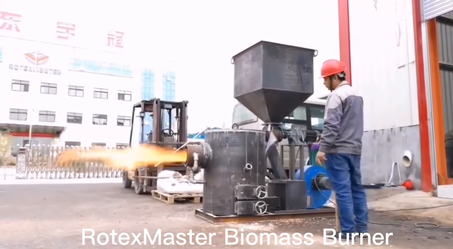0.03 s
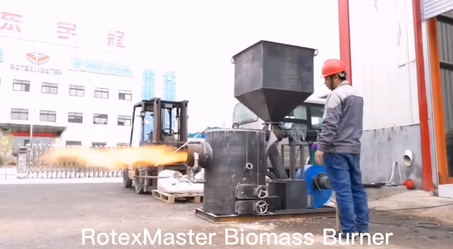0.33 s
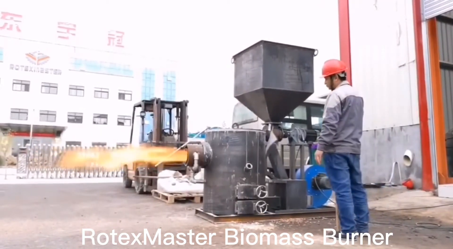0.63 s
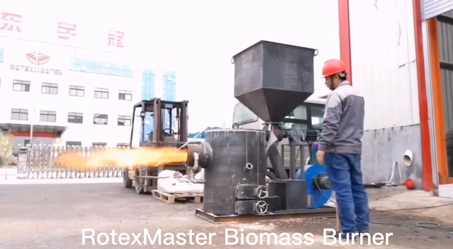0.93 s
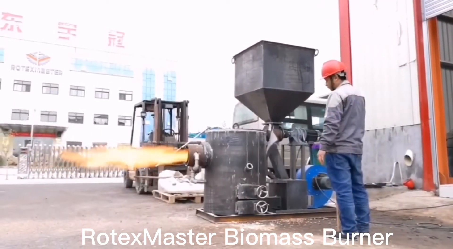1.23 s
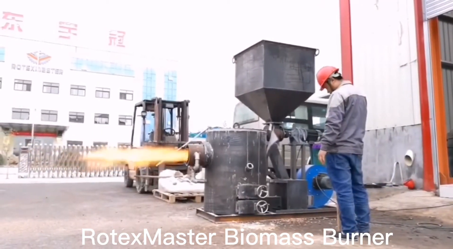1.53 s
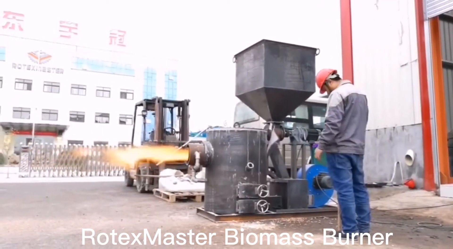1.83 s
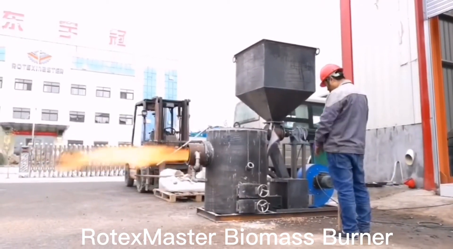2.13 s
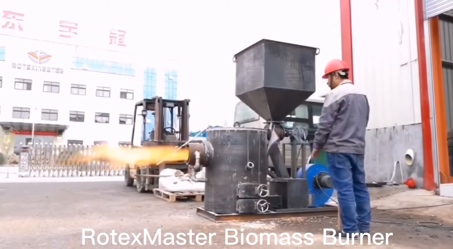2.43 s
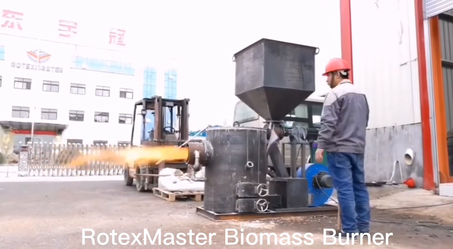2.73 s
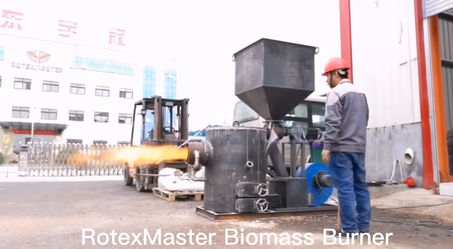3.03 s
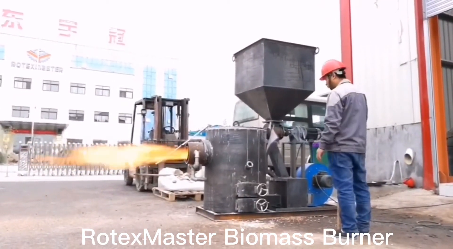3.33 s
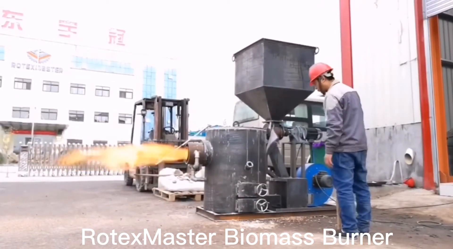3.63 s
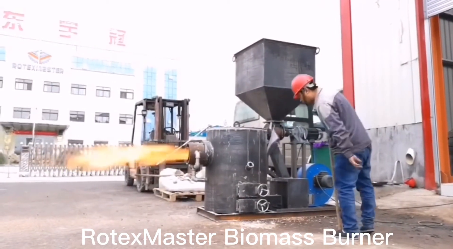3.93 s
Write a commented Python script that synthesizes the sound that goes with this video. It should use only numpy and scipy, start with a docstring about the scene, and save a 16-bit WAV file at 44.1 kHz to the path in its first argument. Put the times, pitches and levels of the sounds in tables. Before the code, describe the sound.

A jet of flame from a burner makes a continuous low, flickering roar, heard from a few metres outdoors. Rasping gas, hissing air and a faint fan hum go with it throughout, with one brief spit partway through.

```python
"""An open yard, where a pellet burner shoots a steady jet of flame a few metres away.
Combustion noise makes a low roar that surges and now and then throbs. Turbulent gas rasps and
excites the hollow resonances of the burner tube, and the nozzle spits once. The forced air
hisses, fluttering with the flame, over the faint tones of the blower and its motor."""
import sys
import numpy as np
from scipy import signal
from scipy.fft import rfft, irfft, next_fast_len
from scipy.io import wavfile
from scipy.ndimage import uniform_filter1d, map_coordinates

SR = 44100
rng = np.random.default_rng(int(sys.argv[2]) if len(sys.argv) > 2 else 0)


def to_wav(sig):
    """Store sig (one row per channel, or 1-D mono) as 16-bit WAV at the path in sys.argv[1].

    Samples outside -1..1 are clipped; the rate is SR.
    """
    pcm = np.clip(np.atleast_2d(sig), -1, 1) * 32767
    pcm = np.round(pcm).astype(np.int16)
    wavfile.write(sys.argv[1], SR, pcm.T)  # frames by channels


N = 176400

# flicker of the flame's treble (time [s], relative level [dB])
TREBLE_FLICKER = [(0.0, -34.5), (0.18, -27), (0.28, -30), (0.5, -29), (0.54, -27), (0.64, -33.5),
                  (0.72, -27), (0.84, -30), (0.9, -39), (0.98, -28.5), (1.22, -30.5), (1.26, -24.5),
                  (1.3, -36), (1.36, -26.5), (1.42, -38), (1.46, -27), (1.52, -31), (1.64, -28.5),
                  (1.68, -33), (1.9, -27.5), (2.06, -32.5), (2.12, -27), (2.22, -32.5), (2.36, -26),
                  (2.4, -42), (2.48, -26.5), (2.54, -36), (2.58, -29.3), (2.72, -37), (2.82, -25),
                  (2.88, -33.5), (3.0, -28.5), (3.16, -33.5), (3.99, -28.5)]


def amp(db):
    """Amplitude ratio of a level in decibels."""
    return 10 ** (np.asarray(db) / 20)


def unit(x):
    """Normalisation to rms 1."""
    return x / np.sqrt(np.mean(x ** 2) + 1e-20)


def colour(points):
    """Spectral envelope through (frequency [Hz], gain [dB]) points on a log frequency axis."""
    f, db = np.transpose(points)
    return lambda hz: amp(np.interp(np.log(hz + 1), np.log(f + 1), db))


def curve(rows):
    """Linear interpolation of (time [s], level [dB]) rows to one level per sample."""
    return np.interp(np.arange(N) / SR, *np.transpose(rows))


def swell_db(rows):
    """Fluctuation of a level curve about its mean."""
    level_db = curve(rows)
    return level_db - level_db.mean()


def wobble(rate_hz):
    """Band-limited random modulation: a spline through rate_hz random values a second."""
    knots = rng.standard_normal(int(N * rate_hz / SR) + 4)
    return map_coordinates(knots, [np.arange(N) * rate_hz / SR])


def puff(at_s, half_s):
    """Gaussian envelope that falls to 1/e at half_s either side of its peak."""
    return np.exp(-((np.arange(N) / SR - at_s) / half_s) ** 2)


def filtered(x, response):
    """Linear filtering: the spectrum of x is multiplied by a frequency response."""
    size = next_fast_len(N + 8192)
    return irfft(rfft(x, size) * response(np.fft.rfftfreq(size, 1 / SR)), size)[:N]


def steady(x, span_s):
    """Division by the running rms holds x near rms 1, removing swells longer than span_s."""
    window = np.hanning(int(span_s * SR) * 2 + 1)
    power = signal.fftconvolve(x ** 2, window, 'same') / signal.fftconvolve(np.ones(N), window, 'same')
    return x / np.sqrt(np.abs(power) + 1e-20)


def turbulence(response, patchy_db, width_bins):
    """Intermittency: eddies give coloured noise brief patches of random gain, at an even overall rms."""
    spectra = signal.stft(rng.standard_normal(N), nperseg=512)[2]
    eddies = uniform_filter1d(rng.standard_normal(spectra.shape), size=width_bins, axis=0)
    eddies = uniform_filter1d(eddies, size=8, axis=1)
    eddies = eddies - uniform_filter1d(eddies, size=36, axis=1)  # only short-lived patches remain
    patchy = signal.istft(spectra * amp(patchy_db * np.tanh(unit(eddies))), nperseg=512)[1][:N]
    return steady(filtered(patchy, response), span_s=0.057)


def blower(drift_hz=5, waver_db=5.0):
    """Rotating machinery radiates tones: fan and motor, each wavering in pitch and level."""
    # tones of the fan and thin whine of its motor (frequency [Hz], median rms level [dB])
    fan_tones = [(321, -43.5), (492, -49.5), (657, -62)]
    motor_whine = [(7053, -64), (7849, -60)]
    tones = np.zeros(N)
    for hz, db in list(fan_tones) + list(motor_whine):
        phase = 2 * np.pi * np.cumsum(hz + drift_hz * wobble(21.83)) / SR
        tones += np.sqrt(2) * amp(db + waver_db * wobble(7.58)) * np.sin(phase)
    return tones


def nozzle_spit(peak_db=-34):
    """A transient jet: one short puff of gas from the nozzle gives a burst of bright noise."""
    # spectrum of the spit (frequency [Hz], relative spectral level [dB])
    spectrum = [(2500, -30), (4800, 2), (6500, 0), (9500, 1), (11000, -30)]
    gas = unit(filtered(rng.standard_normal(N), colour(spectrum)))
    return gas * amp(peak_db) * puff(at_s=1.373, half_s=0.013)


def air_hiss(level_db=-36.5, swell_depth=0.6):
    """Jet noise: turbulence in the forced air makes a high hiss with swells of its own."""
    # spectrum of the air jet (frequency [Hz], relative spectral level [dB])
    spectrum = [(1000, -112), (3500, -2.5), (4600, -6), (5070, -6.5), (5550, -1), (5900, -5), (6350, 2),
                (6750, -6), (7050, -2.5), (7300, -1.5), (7800, 2), (8450, 2.5), (8750, -4.5), (8950, -0.5),
                (9450, -2.5), (9850, -8.5), (11300, -8.5), (12000, -26.5)]
    # swells of the air jet (time [s], relative level [dB])
    air_swells = [(0.0, -39), (0.2, -37.5), (0.39, -35), (0.42, -38), (0.58, -38.5), (0.77, -36),
                  (0.88, -39), (1.27, -34), (1.34, -41), (1.41, -40), (1.44, -36.5), (1.89, -35),
                  (2.08, -39), (2.15, -38), (2.39, -38), (2.43, -40), (2.68, -37), (2.71, -41),
                  (2.82, -32.5), (2.87, -40.5), (3.01, -36.5), (3.13, -42), (3.27, -37), (3.38, -40.5),
                  (3.49, -36.5), (3.69, -39), (3.73, -34.5), (4.0, -37.5)]
    hiss = turbulence(colour(spectrum), patchy_db=4.5, width_bins=5)
    return hiss * amp(level_db + swell_depth * swell_db(air_swells))


def gas_rush(level_db=-33.5, flicker_depth=0.8, rasp_db=1.6, rasp_hz=220):
    """Broadband flow noise of the rushing gas; fast amplitude modulation makes it rasp."""
    # turbulence between the tube's resonances (frequency [Hz], relative spectral level [dB])
    spectrum = [(150, -30), (500, 5.5), (830, 4), (1400, 5.5), (1580, -1.5), (2050, 4.5), (2950, -5),
                (3250, -58), (4100, -4), (4800, -4.5), (5200, -50), (9000, -60)]
    rush = turbulence(colour(spectrum), patchy_db=6.5, width_bins=6)
    return rush * amp(level_db + flicker_depth * swell_db(TREBLE_FLICKER) + rasp_db * wobble(rasp_hz))


def burner_tube(level_db=-27, flicker_depth=0.3):
    """Air-column resonance: the tube's modes pick hollow bands out of the turbulence."""
    # modes of the tube (frequency [Hz], half-width at half amplitude [Hz], relative level [dB])
    modes = [(610, 32, -1), (649.7, 26, 2.5), (1115, 160, 1.5), (1165, 140, -2), (1335, 92, 0),
             (1780, 113, -7.5), (2580, 340, -8), (2750, 283, -6.5), (3525, 69, -6.5), (3800, 190, -8)]

    def response(hz):
        """The resonance peaks add in power."""
        peaks = (amp(db) / (1 + ((hz - centre) / width) ** 2) for centre, width, db in modes)
        return np.sqrt(sum(peak ** 2 for peak in peaks))

    hollow = turbulence(response, patchy_db=4.5, width_bins=3)
    return hollow * amp(level_db + flicker_depth * swell_db(TREBLE_FLICKER))


def flame_roar(throb_db=-2, displaced_share=0.4):
    """Combustion noise swells and sags; in a throb it falls into step for a few strong cycles."""
    # spectrum of the combustion noise (frequency [Hz], relative spectral level [dB])
    spectrum = [(15, -19), (30, -18), (70, -6), (100, -3), (130, 0), (160, -1.6), (185, 1.5), (235, -1.5),
                (262, -6), (292, -5), (340, -6.5), (385, -9), (450, -18.5), (540, -30), (900, -53),
                (2000, -89)]
    # surges of the roar (time [s], level [dB])
    surges = [(0.0, -14), (0.02, -9.5), (0.06, -21.5), (0.08, -11.5), (0.26, -16), (0.3, -10.5),
              (0.36, -18), (0.46, -12), (0.52, -17.5), (0.56, -10.5), (0.6, -18), (0.64, -13.5),
              (0.84, -14), (0.88, -15), (0.9, -14.5), (1.035, -14.5), (1.075, -20), (1.1, -15),
              (1.14, -17.5), (1.18, -14), (1.265, -16), (1.29, -10.5), (1.36, -19), (1.38, -10.5),
              (1.42, -17), (1.56, -13), (1.62, -16.4), (1.7, -11.5), (1.74, -17), (1.76, -12),
              (1.86, -15.5), (2.24, -13), (2.3, -16.4), (2.38, -11.5), (2.42, -22), (2.44, -13),
              (2.72, -16), (2.84, -13.5), (2.88, -16), (3.12, -12.5), (3.16, -20.5), (3.22, -8.5),
              (3.26, -18.5), (3.3, -11.5), (3.36, -18.5), (3.44, -10.5), (3.48, -20.5), (3.54, -9),
              (3.58, -19), (3.6, -14), (3.7, -16), (3.8, -13.5), (3.82, -17.5), (3.88, -12), (3.92, -17),
              (3.99, -14.9)]
    # throbs of the flame (time [s], relative peak level [dB], frequency [Hz])
    throbs = [(0.874, -5, 215), (1.002, -4, 140.6), (1.041, -3.5, 230), (1.286, 0, 184.5),
              (1.383, -3.5, 211.6), (2.376, -2, 202), (2.845, -7, 200), (3.114, -4.5, 152.2),
              (3.444, -6.5, 231.7), (3.536, -4.5, 179.8), (3.605, -5.5, 199.3)]
    combustion = filtered(rng.standard_normal(N), colour(spectrum))
    roar = steady(combustion, span_s=0.034) * amp(curve(surges))
    for at_s, db, hz in throbs:
        envelope = puff(at_s, half_s=0.0081)
        cycles = np.sin(2 * np.pi * (hz * np.arange(N) / SR + rng.random()))
        roar = roar * (1 - displaced_share * envelope) + amp(db + throb_db) * envelope * cycles
    return roar


def scene(flutter_db=1, flutter_hz=61):
    """Superposition at one listening point; tube, gas and air share one quick flutter in level."""
    roar = flame_roar()
    jet = burner_tube() + gas_rush() + air_hiss()
    flutter = amp(flutter_db * wobble(flutter_hz))
    return (roar + jet * flutter + blower() + nozzle_spit())[None]


def record(dry, cutoff_hz=11800):
    """Band limiting: an ideal low-pass filter removes everything above the cutoff."""
    return np.array([filtered(channel, lambda hz: hz < cutoff_hz) for channel in dry])


dry = scene()
out = record(dry)
to_wav(out)
```